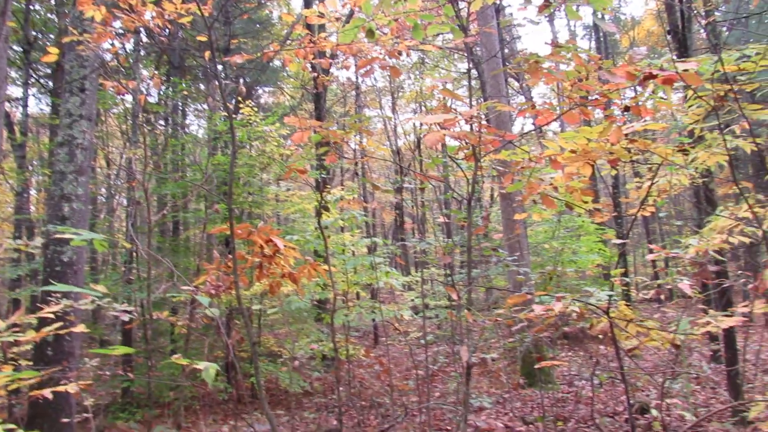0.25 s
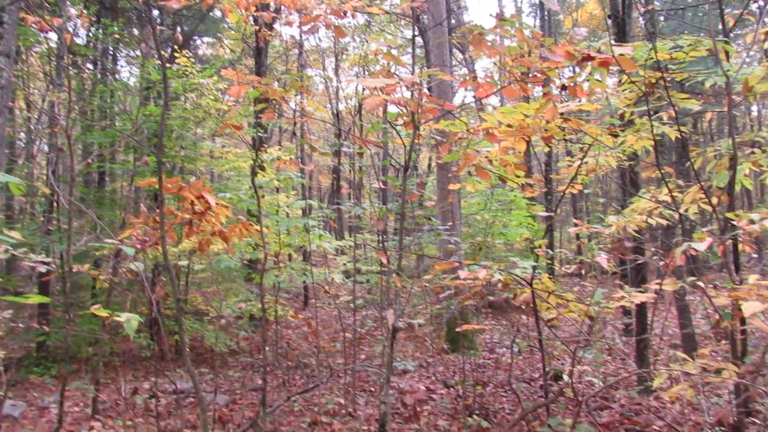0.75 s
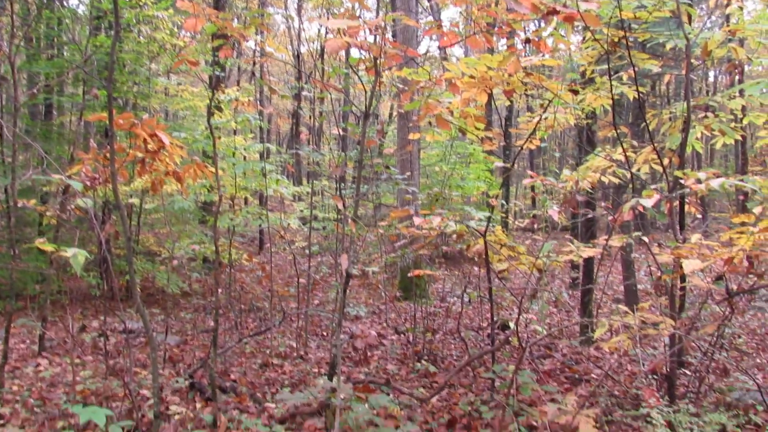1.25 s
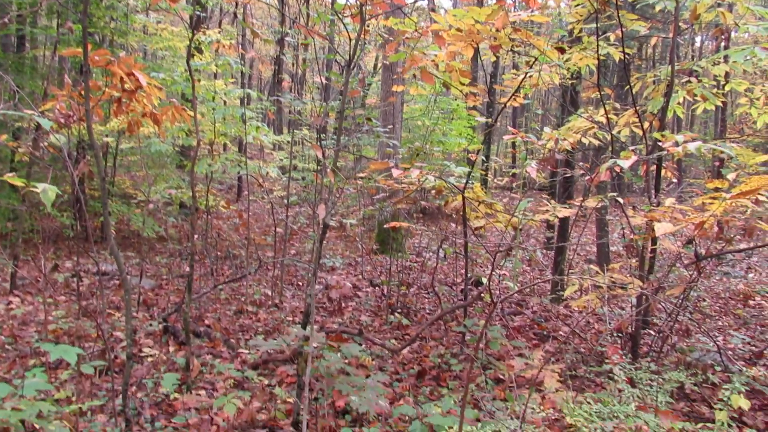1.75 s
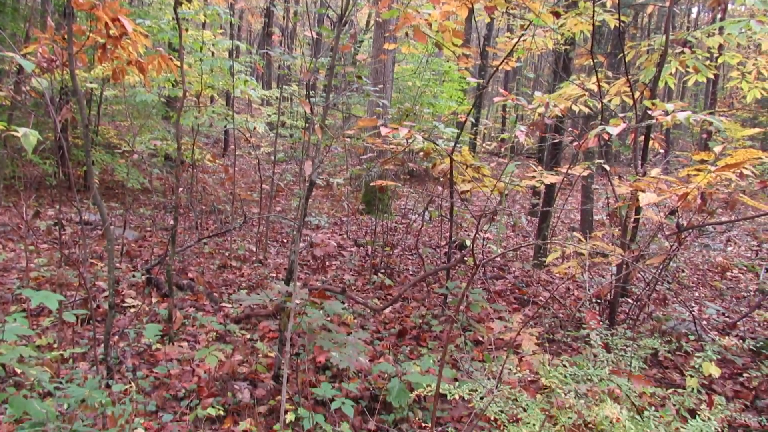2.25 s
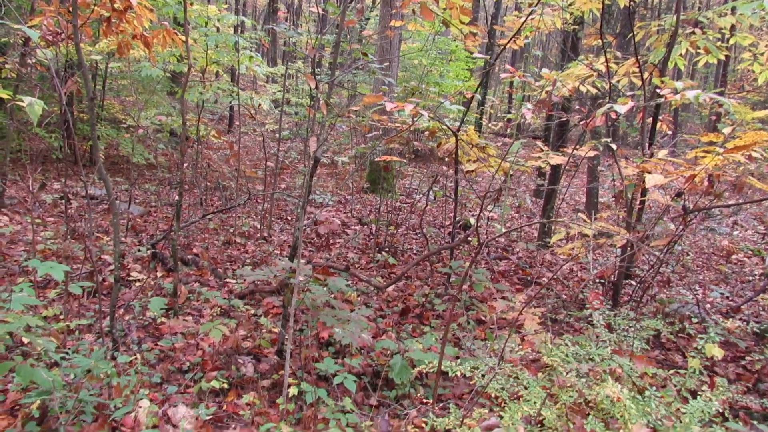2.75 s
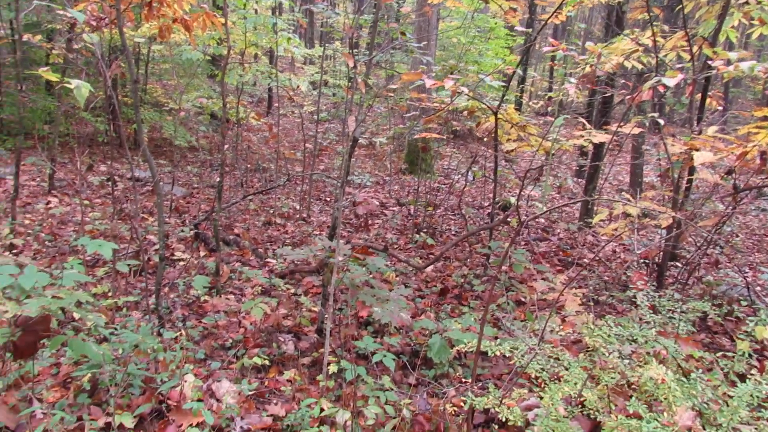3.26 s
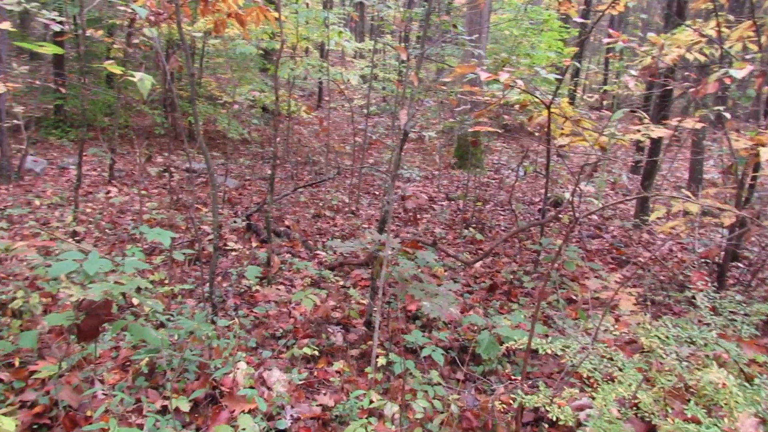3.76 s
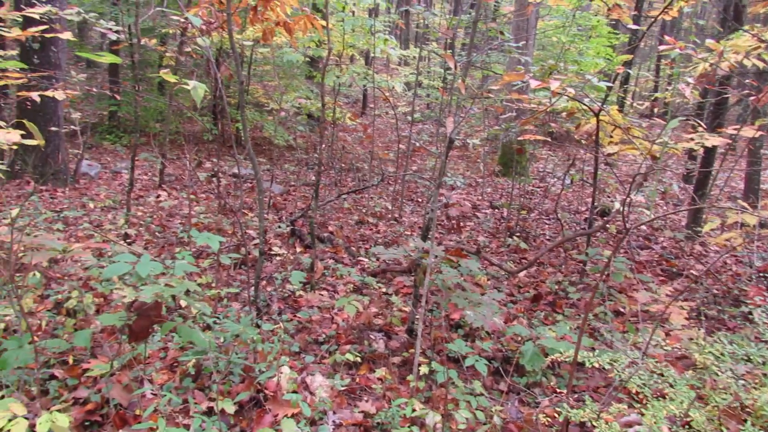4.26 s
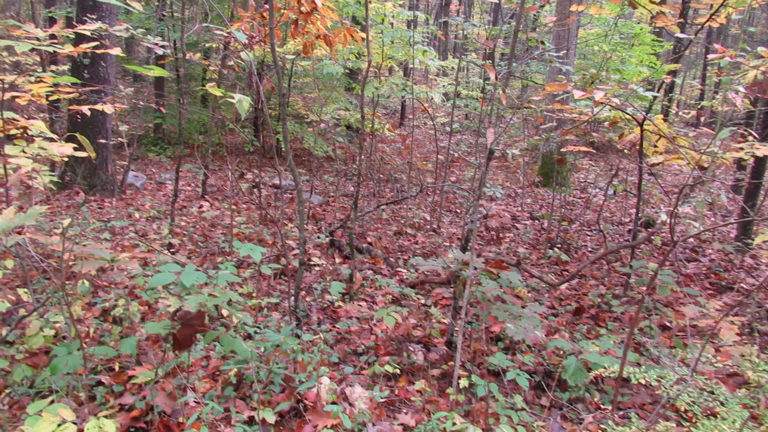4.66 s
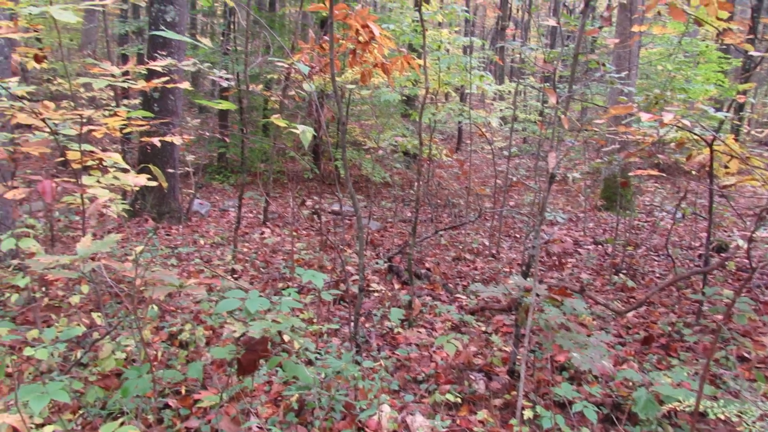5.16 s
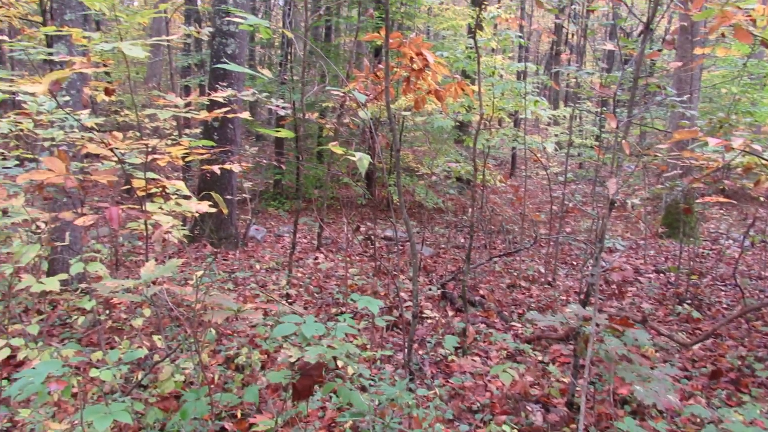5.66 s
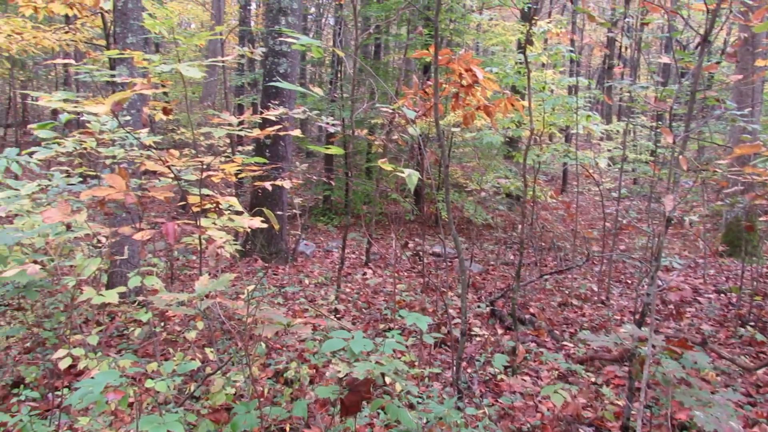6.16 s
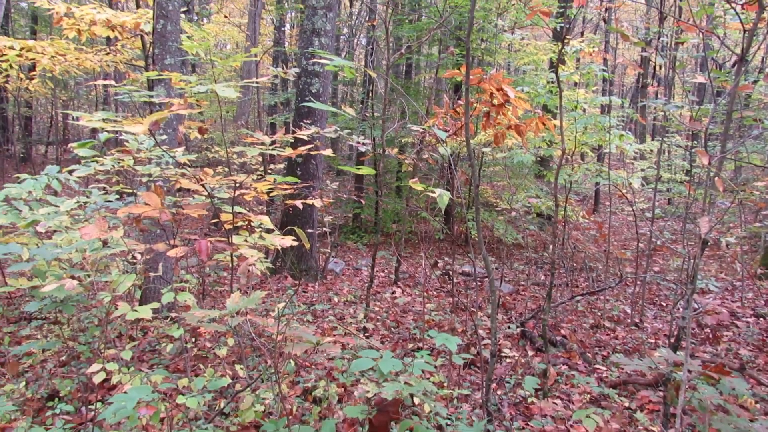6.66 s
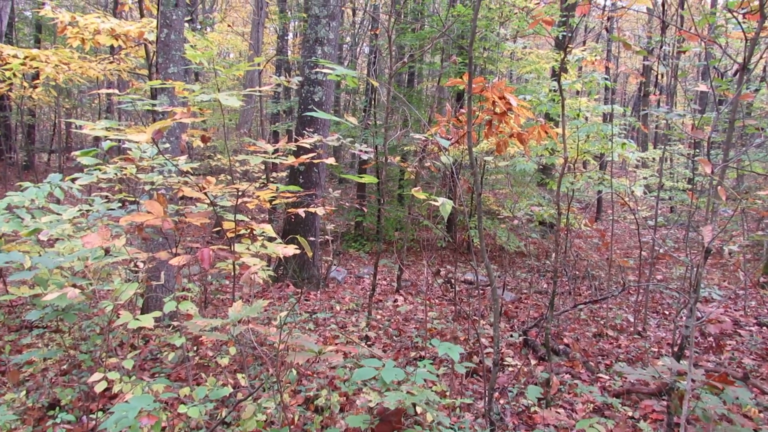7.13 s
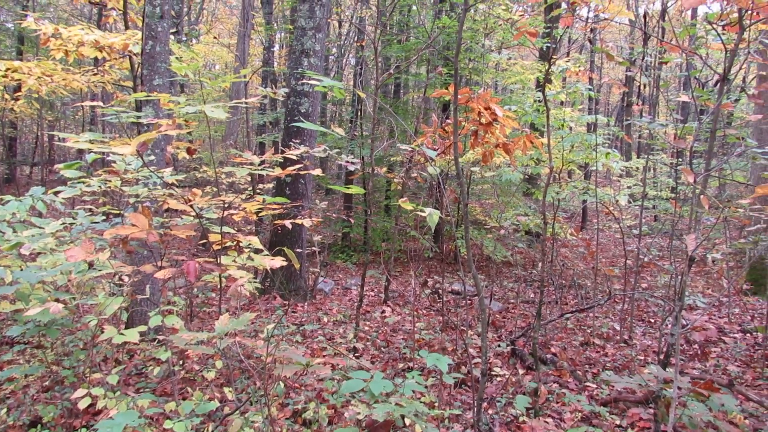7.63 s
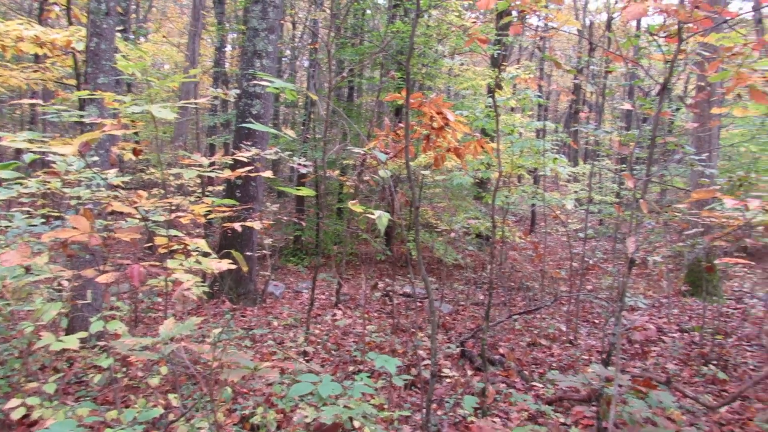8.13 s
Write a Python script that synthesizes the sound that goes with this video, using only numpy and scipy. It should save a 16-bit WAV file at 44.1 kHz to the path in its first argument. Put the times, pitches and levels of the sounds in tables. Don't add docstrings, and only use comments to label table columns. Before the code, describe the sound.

A quiet wood with steady airy hiss, a low wide traffic hum and a barely perceptible thin camera whine. Soft wind flutter brushes the microphone in the first second, and far frogs peep in a blurred, rising and falling chorus throughout. At 0.6 s a near tree frog gives a tiny high upward chirp that breaks into a rasp; similar calls come at 1.9, 3.3, 4.0 and 4.6 s, with a faint crack at 1.25 s. From 1.3 s a second frog answers with pure rising peeps, again near 2.5, 3.1, 3.7, 4.3, 5.1 and 5.9 s. A hard drop smacks a leaf at 2.8 s; softer ones tap at 5.6, 6.3 and 7.1 s. Near 5.4, 6.05, 6.9 and 7.6 s, the close frog's chirps end in loud, sharp rising whistles, echoing briefly among trunks. Distant vehicles swell faintly until the end, around 8.4 s.

```python
import sys
import numpy as np
from scipy import signal
from scipy.fft import rfft, irfft, next_fast_len
from scipy.io import wavfile
from scipy.ndimage import map_coordinates

SR = 44100
rng = np.random.default_rng(int(sys.argv[2]) if len(sys.argv) > 2 else 0)


def nominal_scale(level):
    x = np.asarray(level, float) / 20
    return 10 ** x


def generate_wav(sig):
    pcm = np.round(np.clip(np.atleast_2d(sig).T, -1, 1) * 32767).astype(np.int16)
    wavfile.write(sys.argv[1], SR, pcm)


N = 369999
STEP = 32
ATTACK_S, RELEASE_S = 0.0052, 0.0038


def unit(x):
    return x / np.sqrt(np.mean(x ** 2) + 1e-20)


def along(points, hz):
    f, v = np.transpose(points)
    return np.interp(np.log(hz + 1), np.log(f + 1), v)


def wobble(rate):
    at = np.arange(0, N + STEP, STEP)
    knots = rng.standard_normal(int(N * rate / SR) + 4)
    return np.interp(np.arange(N), at, map_coordinates(knots, [at * rate / SR]))


def swells(rows, rest_db, rise, fall):
    t = np.arange(0, N + STEP, STEP) / SR
    bumps = []
    for s, hold, db in rows:
        before = np.clip(s - t, 0, None)
        after = np.clip(t - s - hold, 0, None)
        bumps.append(db - rise * before - fall * after)
    return np.interp(np.arange(N) / SR, t, np.maximum(rest_db, np.max(bumps, axis=0)))


def filtered(x, response):
    m = next_fast_len(N + SR // 2)
    return irfft(rfft(x, m) * response(np.fft.rfftfreq(m, 1 / SR)), m)[..., :N]


def resonate(x, modes):
    def response(f):
        total = 0
        for k, (center, width, db) in enumerate(modes):
            damping = 1j * f * width
            total = total + (-1) ** k * nominal_scale(db) * damping / (center * center - f * f + damping)
        return total
    return filtered(x, response)


def rush(spectrum):
    return unit(filtered(rng.standard_normal(N), lambda hz: nominal_scale(along(spectrum, hz))))


def ports(mid, side):
    return np.array([mid + side, mid - side])


# frequency in Hz, level in dB per Hz.
HUM_SHARED = [(13, -41), (22, -20), (45, -1.5), (65, 1.5), (132, -3.5), (163, -6), (292, -8), (438, -13),
              (502, -5), (558, -15.5), (678, -27.5), (731, -20.5), (800, -17.5), (1040, -35.5),
              (1760, -120)]
HUM_DIFFERENCE = [(13, -24), (22, -10), (80, 1), (155, 0.5), (310, -3), (502, -9.5), (592, -14), (688, -38),
                  (800, -15.5), (1040, -45), (1760, -120)]


def traffic_hum():
    hum = ports(nominal_scale(-51.5) * rush(HUM_SHARED), nominal_scale(-45.0) * rush(HUM_DIFFERENCE))
    return hum * nominal_scale([[-.6], [.6]])


# start in seconds, hold in seconds, level in dB.
VEHICLES = [
    (0.2, 0.057, -47.5),
    (2.5, 0.15, -54),
    (4.3, 0.076, -52.5),
    (4.93, .03, -49.5),
    (6.19, .02, -51),
    (7.0, 0.092, -54.5),
    (7.48, .03, -49.5),
]


def passing_vehicles():
    level = swells(VEHICLES, rest_db=-63.5, rise=62, fall=30) - 5.5
    return nominal_scale(level) * rush([(150, -40), (230, -6.5), (300, 0.5), (380, -9.0), (480, -43)])


# frequency in Hz, level in dB per Hz.
AIR_SHARED = [(690, -24), (760, -8), (830, -1), (1200, -2), (2000, -5), (3000, -6.5), (5000, -8.5),
              (8000, -8), (11000, -12.5), (15000, -20.5)]
AIR_DIFFERENCE = [(600, -40), (700, -17), (850, -2.5), (1020, 1), (1950, -12.5), (3000, -19), (4300, -22),
                  (6000, -18.5), (9000, -15.5), (12000, -17), (13000, -19.5), (14900, -23)]


def air_hiss():
    return ports(nominal_scale(-58) * rush([(600, -45)] + AIR_SHARED), nominal_scale(-59.5) * rush(AIR_DIFFERENCE))


# start in seconds, hold in seconds, level in dB.
PUFFS = [
    (.08, .01, -44),
    (.35, .01, -47),
    (.5, 0.11, -46.5),
    (.77, 0.11, -47.5),
]


def wind_puffs():
    level = swells(PUFFS, rest_db=-75, rise=135, fall=170)
    gust = nominal_scale(level) * rush([(10, -25), (25, -9), (60, 5), (100, -9), (200, -58)])
    return ports(0.32 * gust, gust)


def motor_whine():
    hz = 12768 + 5 * wobble(20)
    whine = nominal_scale(-85) * np.sin(2 * np.pi * np.cumsum(hz) / SR)
    spin = 1 + 1.4 * np.cos(2 * np.pi * 35 * np.arange(N) / SR)
    return whine * spin * nominal_scale([[2], [-4]])


# time in seconds, peak level in dB, crack level in dB, left-right difference in dB.
DROPS = [
    (2.764, -53, -12, -3),
    (2.807, -28.5, 1, 4.5),
    (5.6343, -46.5, -20, -5),
    (6.2871, -52, -4, 0.0),
    (7.0685, -45.5, -15, -1.5),
]
# frequency in Hz, width in Hz, level in dB.
LEAF_TONES = [(1200, 240, 9), (1950, 800, 3), (2620, 400, 1), (3600, 600, -11)]
CRACK_TONES = [(5400, 550, -8), (7230, 580, -2), (8880, 550, 4), (10130, 1700, -7.5)]


def drops():
    body, crack, t = np.zeros((2, N + 999)), np.zeros((2, N + 999)), np.arange(600) / SR
    for s, db, crack_db, pan_db in DROPS:
        burst = rng.standard_normal((3, len(t)))
        burst[0, :3] = 2.5 * nominal_scale(crack_db)
        splash_s = .028 * nominal_scale(-crack_db / 3)
        pair = nominal_scale([[pan_db / 2], [-pan_db / 2]]) * (burst[0] + .7 * burst[1:])
        at = round(s * SR)
        body[:, at:][:, :len(t)] += nominal_scale(db + 4.5 - 60 * t / splash_s) * pair
        crack[:, at:][:, :len(t)] += nominal_scale(db + crack_db + 9 - 60 * t / 0.0071) * pair
    leaf = resonate(body[:, :N], LEAF_TONES + [(1000, 1600, -7.5)])
    leaf = filtered(leaf, lambda hz: 1 / (1 + (760 / (hz + 1)) ** 4))
    return leaf + resonate(crack[:, :N], CRACK_TONES + [(13500, 2000, -13)])


# frequency in Hz, time to fall by 60 dB in seconds.
LINGER = [(1000, .5), (3500, .85), (9000, .3)]


def trunks(x, gap):
    hz, t, z = signal.stft(rng.standard_normal((2, SR)), SR, nperseg=256)
    tail = signal.istft(z * nominal_scale(-60 * t / along(LINGER, hz)[:, None]), SR, nperseg=256)[1]
    tail = tail / np.linalg.norm(tail[0])
    late = np.pad(x, (round(gap * SR), 0))
    wet = signal.fftconvolve(late[None], tail, axes=1)[:, :N]
    return ports(wet[0], nominal_scale(-11.0) * wet[1])


# start in seconds, hold in seconds, level in dB.
FAR_BOUTS = [(0.0, .02, -56), (0.67, 0.073, -58.5), (0.95, 0.098, -63.5), (1.45, 0.1, -57.5),
             (1.96, 0.21, -60), (2.83, 0.28, -60.5), (3.52, .12, -61.5), (3.76, .1, -61), (4.1, .06, -63),
             (4.4, 0.15, -58), (5.24, .06, -56), (5.9, 0.16, -58.5), (7.0, .06, -62), (7.18, 0.055, -65),
             (7.83, 0.15, -61)]


def far_chorus():
    draw, u = rng.random((900, 4)), np.linspace(0, 1, SR // 16)
    out = np.zeros(N + len(u))
    for start, pitch, rise, size in draw:
        hz = 3110 + 420 * pitch + (150 + 200 * rise) * u
        tone = np.sin(2 * np.pi * np.cumsum(hz) / SR)
        out[int(start * N):][:len(u)] += nominal_scale(4.5 * size) * np.sin(np.pi * u) ** .5 * tone
    level = swells(FAR_BOUTS, rest_db=-67.5, rise=45, fall=44)
    return nominal_scale(level) * unit(trunks(out[:N], gap=.002))


def note(s, length, hz, dbs, attack=ATTACK_S, scoop_hz=0, kick_hz=0):
    times = np.linspace(s + attack, s + length - RELEASE_S, len(hz))
    body = np.column_stack([times, hz, *dbs])

    def edge(row, at, bend_hz):
        return [at, row[1] + bend_hz, row[2] - 11, *(row[3:] - 8)]
    return np.vstack([edge(body[0], s, -scoop_hz), body, edge(body[-1], s + length, kick_hz)])


# frequency in Hz, level in dB.
THROAT_COLOUR = [(1100, -28), (1800, -3.5), (2300, 0), (4900, 3), (5700, -7), (6600, -2.5), (7300, -0.5),
                 (8200, 3.5), (9200, -7), (10800, -5.5), (12800, -22)]


def peeps(notes, order, jitter_hz, top_from=2.75):
    out, waver = np.zeros(N), jitter_hz * wobble(150)
    fades = [2.6 * wobble(50) for _ in range(4 * order)]
    tremble = nominal_scale(1.3 * wobble(110))
    for rows in notes:
        s, hz, db, *over = np.transpose(rows)
        at = np.arange(max(round(s[0] * SR), 0), min(round(s[-1] * SR), N))
        cords = (np.interp(at / SR, s, hz) + waver[at]) / order
        phase = 2 * np.pi * np.cumsum(cords) / SR
        sac = np.interp(at / SR, s, nominal_scale(db)) * tremble[at]
        out[at] += np.sqrt(2) * sac * np.sin(order * phase)
        for k in range(1, 4 * order) if over else []:
            if k == order:
                continue
            top = k > top_from * order
            level = np.interp(at / SR, s, over[-1 if top else 0])
            level = level + along(THROAT_COLOUR, k * cords) + fades[k][at]
            out[at] += nominal_scale(level) * np.sin(k * phase + k)
    return out


# start in
# seconds, length in seconds, first and last pitch in Hz, level in dB.
HELD_NOTES = [
    (0.649, 0.03, 3780, 3820, -55),
    (0.805, 0.042, 3130, 3270, -58),
    (1.365, .16, 3420, 3680, -63),
    (7.849, .07, 3260, 3480, -60),
    (1.608, .1, 3170, 3520, -59.5),
    (3.41, 0.024, 3840, 3840, -52),
    (4.69, 0.044, 3680, 3870, -48),
    (5.524, 0.054, 3590, 3600, -61),
]
# start in seconds, length in seconds, pitch in Hz, level in dB.
DYING_CHIPS = [
    (0.0, 0.059, 3600, -56.5),
    (0.502, .04, 3600, -61),
    (1.949, 0.016, 3380, -45),
    (2.533, .045, 3630, -46.5),
    (4.079, 0.016, 3470, -42),
]
# peep start in seconds, peep length in seconds, last pitch in Hz, level in dB, flick in dB.
SECOND_FROG = [
    (1.3, .056, 3380, -54.5, -63),
    (2.473, 0.047, 3480, -52, -64),
    (3.063, .04, 3570, -52, -58),
    (3.692, .05, 3520, -49.5, -57),
    (4.301, 0.056, 3510, -51, -57),
    (5.107, .062, 3540, -51, -58),
    (5.857, .058, 3550, -50, -56),
]


def other_frogs():
    def pure(s, length, hz, db, attack=ATTACK_S):
        return note(s, length, hz, [db, np.add(db, -17.5), np.add(db, -45)], attack)
    notes = [pure(s, length, [hz, end_hz], [db, db]) for s, length, hz, end_hz, db in HELD_NOTES]
    for s, length, hz, db in DYING_CHIPS:
        notes.append(pure(s, length, [hz, hz], [db, db - 17], attack=.002))
    for s, length, hz, db, flick_db in SECOND_FROG:
        pip = pure(s - .008, 0.013, [4200, 4200], [-63, -67])
        peep = pure(s, length, [3200, .4 * 3200 + .6 * hz, hz], [db - 4, db + 0.2, db])
        flick = pure(s + length + 0.00209, 0.031, [4270, 3880], [flick_db, flick_db - 8])
        notes += [pip, peep, flick]
    return peeps(notes, order=2, jitter_hz=25.0, top_from=1.75)


# start in seconds, length in seconds, highest sac pitch in Hz,
# sac level in dB, top overtones in dB.
FIRST_SYLLABLES = [
    (0.579, 0.04, 3300, -49, -77),
    (1.897, .039, 3270, -46, -64),
    (3.332, .029, 3300, -47, -72),
    (4.036, .025, 3290, -48, -66),
    (4.636, 0.045, 3324, -49, -76),
    (5.317, 0.047, 3330, -50, -69),
    (5.994, 0.052, 3423, -49.5, -58),
    (6.814, 0.047, 3404, -49, -49),
    (7.508, 0.058, 3440, -48, -50),
]


def opening_notes():
    start_hz, tuned_hz, swell_db_per_hz = 3190, 3370, 0.1131
    notes = []
    for s, length, hz, db, top in FIRST_SYLLABLES:
        climb = hz - start_hz
        pitch = [start_hz, start_hz + 0.77 * climb, hz, hz - 26]
        sac = db + swell_db_per_hz * (hz - tuned_hz) * np.array([0.027, 0.52, 0.97, .1])
        over = -55.5 - 0.05 * climb * np.array([0, .4, .9, 1.1])
        tops = [top - 7, top, top, top]
        notes.append(note(s, length, pitch, [sac, over, tops], attack=0.0051, scoop_hz=170))
    return notes


# start in seconds, length in seconds, last sac pitch in Hz,
# sac level in dB, top overtones in dB.
END_WHISTLES = [
    (5.369, 0.067, 3650, -37.5, -58),
    (6.05, .06, 3775, -35.5, -51),
    (6.863, .067, 3650, -39.5, -72),
    (7.558, 0.061, 3780, -39, -53),
]


def whistle_notes():
    first_hz = 3480
    notes = []
    for s, length, hz, db, top in END_WHISTLES:
        pitch = first_hz + (hz - first_hz) * np.linspace(0, 1, num=4) ** 0.61
        sac = db - np.array([2.5, 0, .8, 7])
        over = -55.5 + 1.2 * (db + 38) - np.array([5, 4.5, 0, 3.5])
        tops = top - np.array([1.5, 1, -7, 11])
        notes.append(note(s, length, pitch, [sac, over, tops], attack=0.0067, kick_hz=550))
    return notes


# start in seconds, length in seconds, first and last pitch in Hz, sac level in dB.
VOICE_BREAKS = [
    (0.615, 0.0337, 3330, 3520, -48),
    (1.246, .028, 3360, 3250, -54.5),
    (1.933, 0.01, 3700, 3480, -46),
    (3.353, 0.029, 3360, 3250, -55),
    (4.06, 0.0153, 3460, 3200, -49),
    (4.676, 0.015, 3500, 3510, -50),
    (5.36, 0.013, 3590, 3400, -50),
]


def break_notes():
    notes = []
    for s, length, hz, end_hz, db in VOICE_BREAKS:
        notes.append(note(s, length, [hz, end_hz], [[db, db - 2.5], [db - 10, db - 11.5]]))
    return notes


# time in seconds, peak level in dB.
CORD_SNAPS = [(0.5776, -58), (0.6454, -56), (1.2456, -40), (1.2684, -53), (1.8976, -54), (1.9364, -54),
              (3.3324, -57), (3.3654, -43), (4.0352, -55), (4.0638, -43), (4.6359, -54), (4.6836, -48),
              (4.6912, -40), (5.3574, -38)]


def snaps():
    out, t = np.zeros(N + 999), np.arange(300) / SR
    cutoffs = [(s + length - RELEASE_S, db - 10) for s, length, _, db, _ in END_WHISTLES]
    for s, db in CORD_SNAPS + cutoffs:
        out[round(s * SR):][:len(t)] += nominal_scale(db + 2 - 60 * t / .03) * rng.standard_normal(len(t))
    return resonate(out[:N], [(3300, 900, 4), (4300, 900, 1), (8000, 1800, -5)])


def near_frog():
    clear = peeps(opening_notes() + whistle_notes(), order=2, jitter_hz=9.9)
    return clear + peeps(break_notes(), order=3, jitter_hz=70) + snaps()


# frequency in Hz, left-right difference in dB.
SIDE_LEAN = [(1500, 2), (3500, 0.5), (5000, 2), (8000, 2), (12000, 1)]


def near_frog_place(hz):
    side = np.array([[1], [-1]])
    return nominal_scale(along(SIDE_LEAN, hz) * side / 2) * np.exp(1j * np.pi * hz * 1.6e-5 * side)


def scene():
    background = traffic_hum() + passing_vehicles() + air_hiss() + wind_puffs() + motor_whine()
    second, near = other_frogs(), near_frog()
    direct = filtered(near, near_frog_place) + second * nominal_scale([[-3], [2.5]])
    answer = nominal_scale(-16) * trunks(near + second, gap=.012)
    return background + drops() + far_chorus() + answer + direct


def roll_off(x):
    return signal.sosfilt(signal.butter(12, 15710, fs=SR, output="sos"), x)


def record(dry):
    mix = filtered(dry, lambda hz: hz < 14990)
    return roll_off(mix)


dry = scene()
out = record(dry)
generate_wav(out)
```